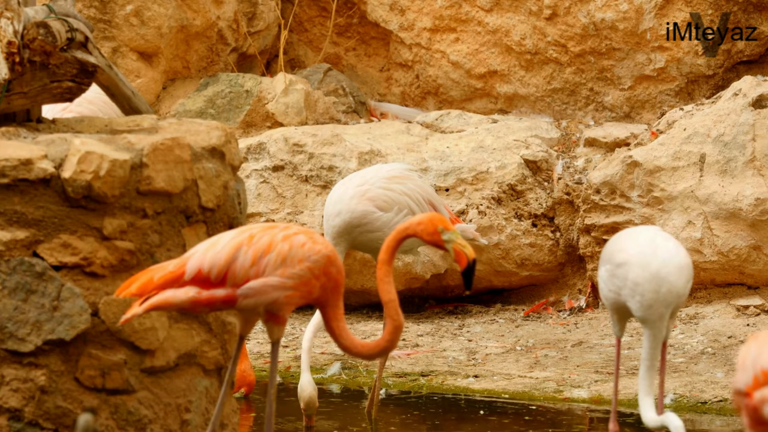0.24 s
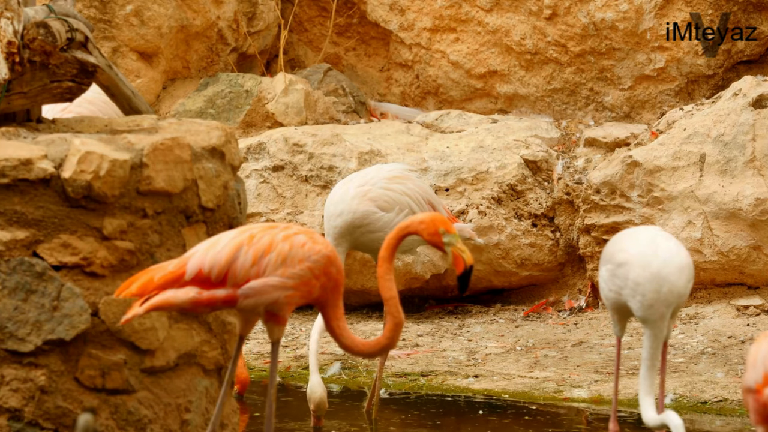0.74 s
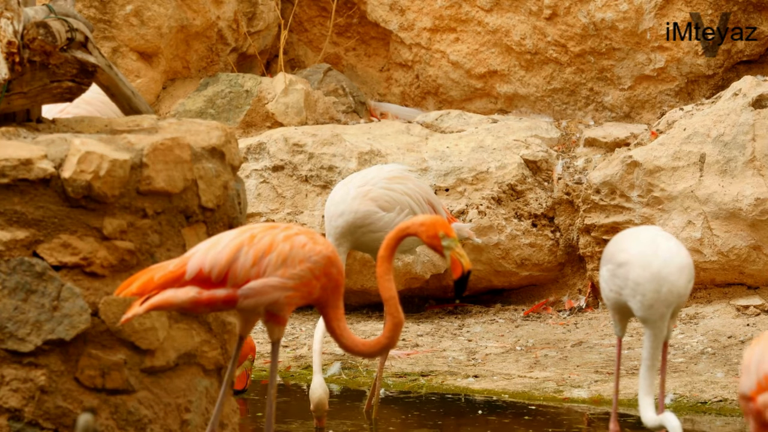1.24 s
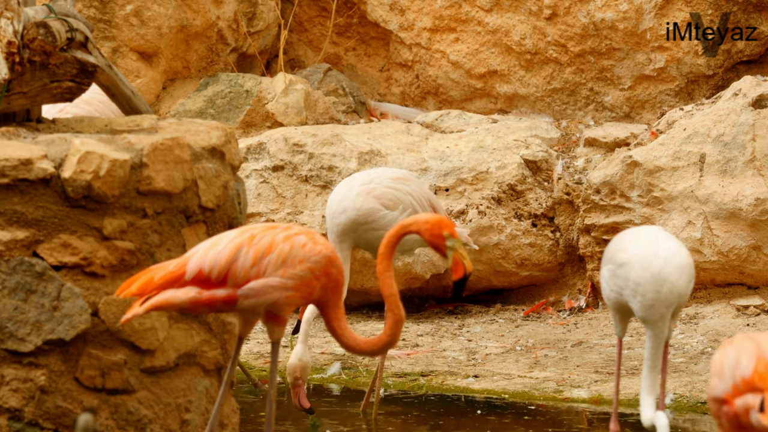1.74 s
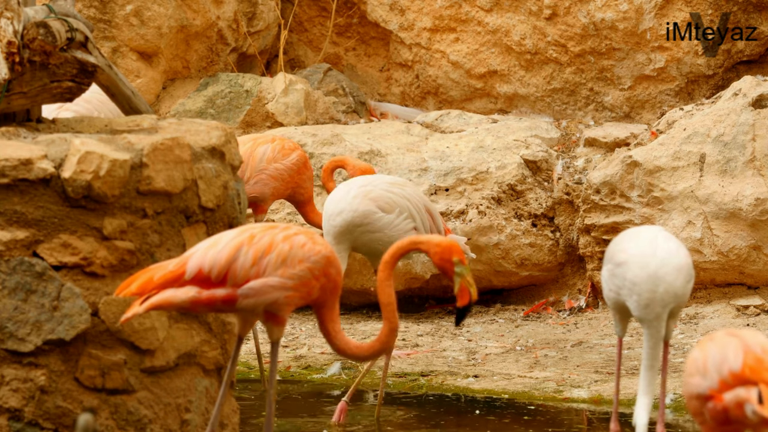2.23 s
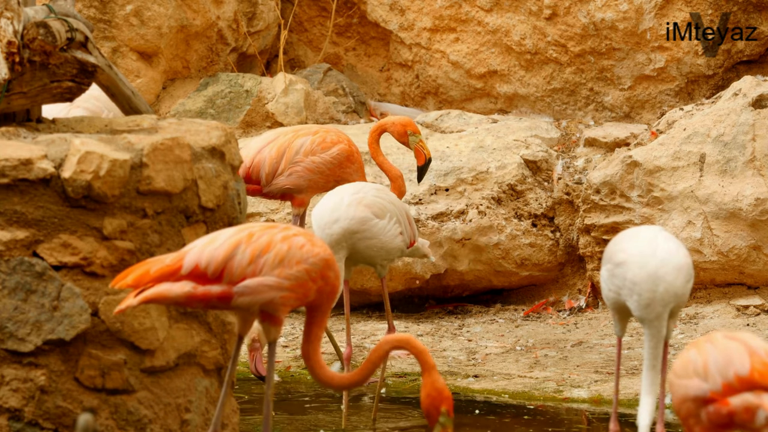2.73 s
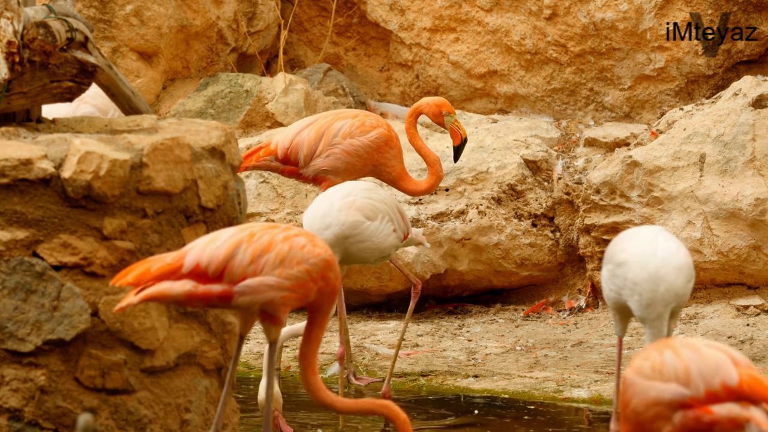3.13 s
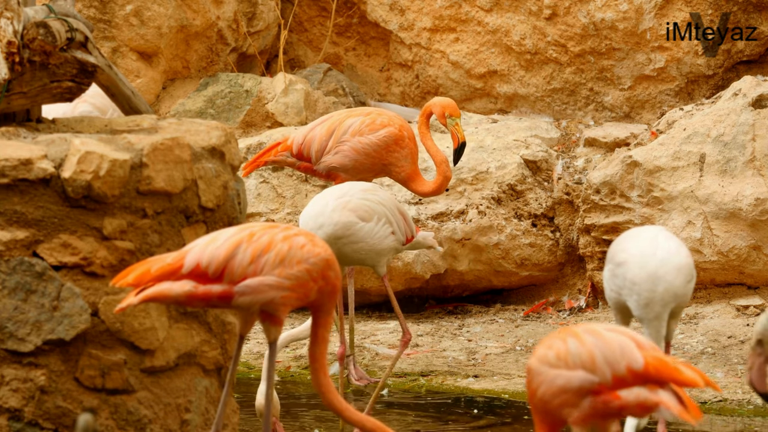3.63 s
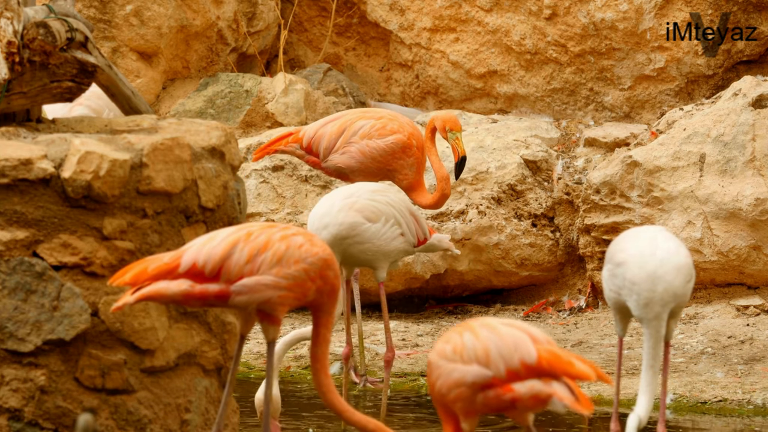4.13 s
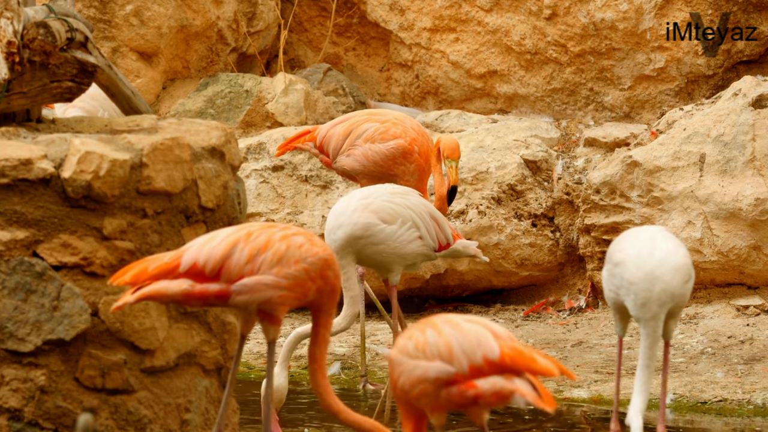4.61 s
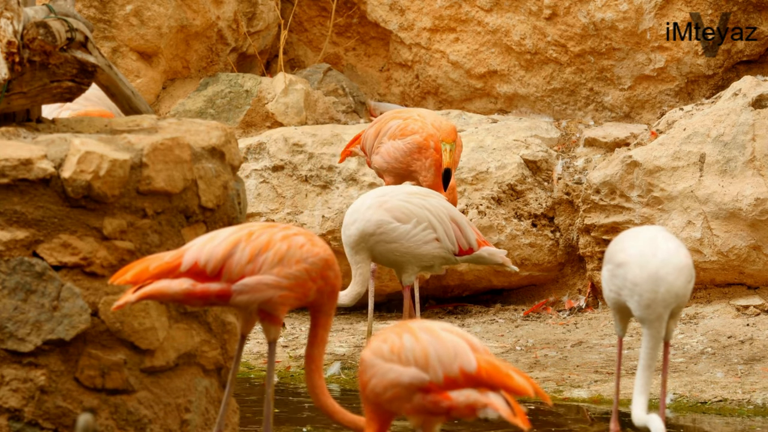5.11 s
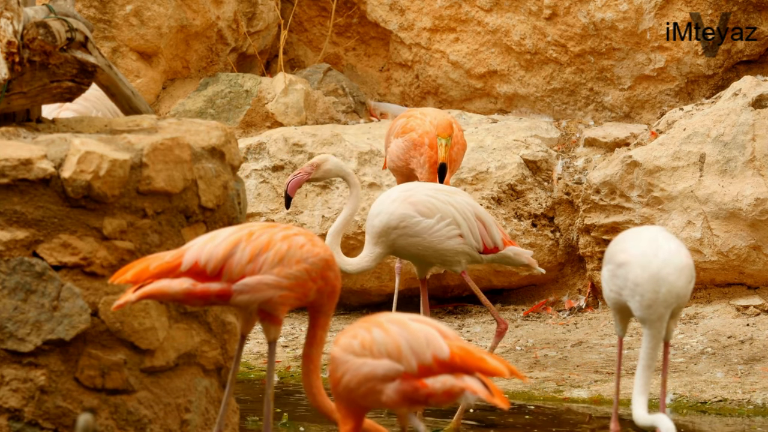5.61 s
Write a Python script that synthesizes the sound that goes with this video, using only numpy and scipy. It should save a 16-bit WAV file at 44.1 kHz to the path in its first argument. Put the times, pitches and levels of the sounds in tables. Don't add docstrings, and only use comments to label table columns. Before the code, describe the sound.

Stereo outdoor ambience beside shallow water: low murmur, hollow gurgling and a thin, high insect hiss. Distant flamingos gabble and honk, mostly to the right. One close bird gives a weak honk and a squeal, then from just before one second repeats dry, nasal, rasping barks almost four times a second until the end. A few tiny falling whistles appear in the later half. Rock walls add quick reflections and a light tail.

```python
import sys
import numpy as np
from scipy import signal
from scipy.io import wavfile
from scipy.ndimage import uniform_filter1d

SR = 44100
rng = np.random.default_rng(int(sys.argv[2]) if len(sys.argv) > 2 else 0)


def undo_db(level):
    steps = np.asarray(level, float) / 20
    return 10 ** steps


def unload_audio(sound):
    columns = np.transpose(np.atleast_2d(sound))
    steps = np.round(np.clip(columns, -1, 1) * 32767)
    wavfile.write(sys.argv[1], SR, steps.astype(np.int16))


N = 258426
SIDE = np.array([[1], [-1]])


def unit(x):
    return x / np.sqrt(np.mean(x ** 2))


def ring(x, hz, width):
    return signal.lfilter(*signal.iirpeak(hz, hz / width, SR), x)


def double_ring(x, hz, width):
    return ring(ring(x, hz, width), hz, width)


def walk(rate, count):
    k = int(SR / rate)
    held = np.repeat(rng.standard_normal(count // k + 1), k)
    return 1.29 * uniform_filter1d(uniform_filter1d(held, k), k)[:count]


def add(out, sound, start_s, pan_db):
    i = int(start_s * SR)
    placed = sound * undo_db(pan_db * SIDE / 2)
    out[:, i:i + len(sound)] += placed[:, :N - i]


def murmur(water_db, pan_db):
    # hz, level_db (per Hz)
    spectrum = [(15, -62), (25, -25), (70, -30), (130, -6.5), (242, -0.5), (326, -1.5), (560, -12),
                (800, -10.5), (1300, -14.5), (2200, -23), (3800, -18.5), (6400, -33.5), (14800, -45),
                (16000, -51)]
    hz_points, db_points = np.transpose(spectrum)
    total, swell = 0, walk(0.387, N)
    for hz in 28 * 2 ** np.arange(0, 9.2, .5):
        sos = signal.butter(1, [hz / 1.222, hz * 1.294], "band", fs=SR, output="sos")
        mid, other = signal.sosfilt(np.vstack([sos, sos]), rng.standard_normal((2, N)))
        low_share = 1 / (1 + (hz / 830.0) ** 2) / (1 + (120.0 / hz) ** 2)
        db = np.interp(np.log(hz), np.log(hz_points), db_points) + low_share * (water_db + 48.0)
        db = db + .8 * swell + 1.2 * walk(7, N)
        spread = np.clip(hz / 525.0, .33, 1.2) * other * SIDE
        total = total + undo_db(db + low_share * SIDE * pan_db / 2) * (mid + spread)
    return undo_db(-23.5) * total


def gurgle(water_db, pan_db):
    mid, other = rng.standard_normal((2, N))
    hollow = double_ring(mid + .5 * other * SIDE, 290., 130.)
    lumpy_db = 3 * walk(18, N) + 2 * walk(4, N)
    return undo_db(-49 + 2.2 * (water_db + 46) + lumpy_db + SIDE * pan_db / 2) * unit(hollow)


def cicadas(t):
    # hz, width_hz, level_db
    membranes = [(5200, 350, -6), (5396, 440, 5.5), (8000, 400, -18)]
    level_db = -47. + .5 * t - 4.5 * np.exp(-t / 0.31) + 0.52 * walk(1.23, N)
    mid, other = rng.standard_normal((2, N))
    source = mid + 0.18 * other * SIDE
    song = sum(undo_db(db) * double_ring(source, hz, width) for hz, width, db in membranes)
    shimmer = undo_db(1.2 * walk(14, N))
    return undo_db(level_db) * shimmer * unit(song)


def distant_flock(level_db):
    # hz, width_hz, level_db
    gabble = [(1170, 240, -5.5), (1371, 400, -7), (2300, 570, -9)]
    voices = rng.standard_normal((2, N)) * undo_db(2.5 * walk(60, N))
    flock = sum(undo_db(db) * double_ring(voices, hz, width) for hz, width, db in gabble)
    patchy = undo_db(2.2 * walk(15, N))
    return undo_db(level_db - 3.7 * SIDE) * patchy * unit(flock)


def ground():
    # start_s, water_db, flock_db
    swells = [(0.0, -55, -53.5), (0.15, -54.5, -43.5), (0.65, -50, -45.5), (1.37, -49.5, -43),
              (1.9, -49.5, -47.5), (2.5, -44.5, -42), (3.4, -47, -47.5), (3.801, -46.5, -51),
              (4.7, -42, -45), (5.3, -42, -48), (5.86, -44.5, -64)]
    s, *columns = np.transpose(swells)
    t = np.arange(N) / SR
    water_db, flock_db = (np.interp(t, s, c) for c in columns)
    pan_db = 2 - 0.73 * t
    return gurgle(water_db, pan_db) + murmur(water_db, pan_db) + cicadas(t) + distant_flock(flock_db)


def small_birds():
    # start_s, peak_db, pitch_hz, length_s
    chirps = [
        (3.564, -48, 3780, 0.053),
        (3.63, -60, 3800, 0.06),
        (3.714, -59, 4220, 0.048),
        (4.532, -37.5, 3870, 0.051),
        (5.658, -37, 3940, 0.039),
    ]
    out = np.zeros((2, N))
    for s, db, hz, length in chirps:
        t = np.arange(0, length, 1 / SR)
        wobble = 1 - 0.11 * t + 0.0068 * walk(150, len(t))
        whistle = np.sin(2 * np.pi * np.cumsum(hz * wobble) / SR)
        level = undo_db(db - 5.0 + 2.7 * walk(80, len(t)))
        add(out, level * np.sin(np.pi * t / length) * whistle, s, -2.)
    return out


def rocks(x):
    # late_s, left_db, right_db
    reflections = [
        (.0031, -43.5, -111),
        (.0074, -15.5, -10.5),
        (0.0115, -16.5, -9.5),
        (0.0196, -23, -44),
    ]
    # hz, t60_s, level_db
    tails = [(680, 0.55, -12), (1400, 0.3, -29), (2070, 0.9, -16), (4060, 1.0, -17.5), (6160, 0.96, -15),
             (10000, 0.11, -8.5)]
    t = np.arange(SR) / SR
    response = np.zeros((2, SR))
    for hz, t60, db in tails:
        sos = signal.butter(2, [hz / np.sqrt(2), hz * np.sqrt(2)], "band", fs=SR, output="sos")
        band = signal.sosfilt(sos, rng.standard_normal((2, SR)))
        decay = undo_db(-60 * t / t60) + undo_db(3.0 - 60 * t / 0.27)
        response += band * undo_db(db - 32.5) * decay * np.minimum(t / 0.0072, 1)
    slap_s, slap_db = 0.104, np.array([[-20], [-32]])
    rough_wall = rng.standard_normal((2, SR)) * np.exp(-np.abs(t - slap_s) / 0.0035)
    response += rough_wall * undo_db(slap_db - 25.5)
    echoes = np.zeros((2, SR))
    for late, left_db, right_db in reflections:
        echoes[:, int(late * SR)] = undo_db(np.array([left_db, right_db]))
    close = signal.fftconvolve(x, echoes, axes=1)[:, :N]
    tail = signal.fftconvolve(x.mean(0)[None], response, axes=1)[:, :N]
    return close, tail


def windpipe(drive, modes):
    pipe = 0
    for k, (hz, width, db) in enumerate(modes):
        mode = ring(ring(drive, hz, width), hz, 3.17 * width)
        pipe = pipe + (-1) ** k * undo_db(db) * np.sqrt(300 / width) * mode
    pipe = signal.sosfilt(signal.butter(3, 7360, fs=SR, output="sos"), pipe)
    return signal.sosfilt(signal.butter(2, 900., "high", fs=SR, output="sos"), pipe)


def voice(first_hz, last_hz, length, nasal_db, modes, hiss_db, rough):
    t = np.arange(4000) / SR
    hz = last_hz + (first_hz - last_hz) * np.exp(-(t / .016) ** 1.574)
    push = .58 + .42 * np.sin(np.pi / 2 * np.minimum(t / (.4 * length), 1))
    push = push * undo_db(-13. * np.maximum(t / length - .45, 0) / 1.36)
    push = push / (1 + np.exp(np.minimum((t - length) / 0.0057, 50)))

    even = 2 * np.pi * np.cumsum(hz * (1 + rough * .03 * walk(250, len(t)))) / SR
    swell = undo_db(rough * 4. * walk(300, len(t)))
    chest = undo_db(-10.5) / np.sqrt(1 + ((hz - 530.) / 60.0) ** 2)
    partials = np.cos(2 * even) + chest * np.cos(even)
    nasal = undo_db(nasal_db + 3.5) * np.exp(-t / 0.026) * push * swell * partials / 20

    rough = rough * (.4 + np.minimum(t / .012, 1))
    phase = 2 * np.pi * np.cumsum(hz * (1 + rough * .085 * walk(600, len(t)))) / SR - np.pi / 4
    clicks = np.exp(60. * (np.cos(phase) - 1))
    air = rng.standard_normal(len(t)) * (.5 + np.cos(phase / 2) ** 2) * push
    drive = clicks * undo_db(rough * 3.2 * walk(600, len(t))) * push + rough * .1 * air

    body = undo_db(-15) * rough * double_ring(air, 530., 123)
    sound = nasal + windpipe(drive, modes) + body
    hiss = ring(ring(air, 5000.0, 7400.0), 6100.0, 7200.0)
    loud = slice(0, int(length * SR))
    return sound / np.std(sound[loud]) + undo_db(hiss_db) * hiss / np.std(hiss[loud])


def far_birds():
    # start_s, peak_db,
    # strongest_line_hz, pan_db (left minus right), pipe_db
    far_honks = [(0.1445, -26.5, 1353, -4, 0), (0.196, -46, 1150, -3.0, 7), (0.349, -24.5, 1150, -7, 3.5),
                 (0.59, -29.5, 1437, -12, 3.5), (0.6343, -30.5, 1335, -11, -1), (0.671, -28.5, 1294, -7, -10),
                 (0.7138, -29.5, 1170, -3, -14), (2.483, -25, 885, -14, -15), (0.809, -28.5, 1170, -13, 3.5),
                 (1.047, -36, 1177, -12, 6), (1.3663, -37, 1134, 0.0, -23), (2.095, -32, 1191, -21, -6),
                 (2.18, -35, 1205, -18, -5), (2.7514, -25, 1089, -25, -1.5), (2.7528, -23, 1495, -12.5, -17),
                 (2.808, -24.5, 1400, -9, 6.5), (3.0284, -28.5, 1104, -30, -8), (3.102, -25, 1228, -11, 6.5),
                 (3.5316, -41.5, 1296, -29, -21), (3.5713, -30.5, 1274, -10, -23), (3.919, -33, 1092, -21, 5),
                 (4.27, -39, 1018, -19, 10)]
    out = np.zeros((2, N))
    for s, db, hz, pan_db, pipe_db in far_honks:
        modes = [(997.0, 270, 4.8), (1466.0, 83, 0.54), (2290.0, 470, pipe_db),  # Hz, width Hz, dB
                 (3060.0, 490, pipe_db - 1.5), (4300.0, 2200, pipe_db + 1.5)]
        honk = voice(hz / 2 * 1.04, hz / 2 * .95, .033, 2.4, modes, -57.0, rough=.85)
        add(out, undo_db(db - 12.5) * honk, s, pan_db)
    return out


def squeal():
    # start_s, pitch_hz, effort_db
    contour = [
        (0.409, 1400, -47),
        (0.448, 1430, -23.5),
        (0.463, 1475, -18.5),
        (0.473, 1441, -15),
        (0.481, 1400, -10.5),
        (0.490, 1330, -17),
        (0.496, 1290, -45),
    ]
    # hz, width_hz, level_db
    throat = [(566, 140, 1), (1150, 420, 7.5), (2000, 1360, 0.5), (4730, 1040, 1.5), (7270, 2500, -7.5),
              (11700, 13000, -19.5)]
    s, *columns = np.transpose(contour)
    t = np.arange(s[0], s[-1], 1 / SR)
    hz, effort_db = (np.interp(t, s, c) for c in columns)
    lock_s, lock_takes_s = 0.462, 0.0087
    locked = 1 / (1 + np.exp((lock_s - t) / (lock_takes_s / 2)))
    tone_db = effort_db - 15. * (1 - locked)
    rasp_db = effort_db - 11. * locked
    fourth_db = effort_db - 2.5 - 14.4 * np.abs(t - 0.468) / 0.013
    phase = 2 * np.pi * np.cumsum(hz) / SR
    air = rng.standard_normal(len(t)) * undo_db(2.2 * walk(400, len(t)))
    rasp = sum(undo_db(db) * double_ring(air, centre, width) for centre, width, db in throat)
    tone = undo_db(tone_db + 3.5) * np.sin(phase) + undo_db(fourth_db + 2.5) * np.sin(4 * phase)
    out = np.zeros((2, N))
    add(out, tone + undo_db(rasp_db) * unit(rasp), s[0], 10.2)
    return out


def near_bird():
    # start_s, peak_db, first_pitch_hz, last_pitch_hz, hiss_db (rises as the beak turns to us)
    honks = [(0.0472, -16.5, 729, 626, -46), (0.85, -4, 656.6, 640, -55), (1.163, -1.5, 751, 591.5, -33),
             (1.4386, -2.5, 702, 635.4, -37), (1.7056, -1.5, 707.5, 569, -25),
             (1.9617, -2.5, 724.4, 530, -22), (2.2331, -5.5, 700.6, 598.4, -28),
             (2.5018, -5, 712, 628, -30), (2.778, -7.5, 703, 668, -32), (3.0564, -6, 690.4, 597.3, -29),
             (3.354, -7, 690, 604.6, -28), (3.8248, -5.5, 648, 653.5, -30), (4.079, -4.5, 714, 513, -27),
             (4.3513, -3.5, 698.6, 515, -17), (4.6266, -4, 704, 598, -18), (4.9166, -5.5, 645, 557, -17.5),
             (5.176, -4, 655.4, 541, -15.5), (5.4537, -4.5, 695.6, 530, -20.5),
             (5.7289, -5, 615.6, 524, -18)]
    # start_s, middle_pipe_hz (neck bend), nasal_db (over the pipe), low_ring_db, length_s
    neck = [(0.05, 2300, 0.5, 5.5, 0.031), (0.85, 2656, -2.5, 3, 0.03), (1.17, 2560, -5.5, 3.5, 0.035),
            (1.71, 2450, -6.5, 2, 0.029), (2.2, 2460, -4.5, -3, 0.039), (2.78, 2514, -1, 5, 0.033),
            (3.788, 2300, -6.5, -1, 0.028), (4.08, 2325, -4, -3, 0.038), (4.495, 2380, -6, 1.5, 0.033),
            (5.0, 2375, -3.5, -7.5, 0.027), (5.727, 2275, -2, -3, .031)]
    # start_s, hoarseness (0-1)
    hoarseness = [(0.05, .4), (0.85, .25), (1.16, .55), (1.45, .45), (2.0, .75), (3.5, .75), (3.82, .5),
                  (4.1, .8), (4.65, .75), (4.9, .5), (5.45, .7), (5.73, .6)]
    # hz, width_hz, level_db
    skull_modes = [(4397, 320, -15.5), (5190, 760, -13), (6060, 440, -21.5), (6630, 1220, -16.5),
                   (9800, 490, -38)]
    pipe_width_hz = [170, 210, 250, 290]
    pipe_level_db = [1.5, 2.5, 0]
    out = np.zeros((2, N))
    at, *posture = np.transpose(neck)
    skull = [(hz, width, level_db + 11.) for hz, width, level_db in skull_modes]
    for s, db, first, last, hiss_db in honks:
        middle, nasal_db, low_db, length = (np.interp(s, at, c) for c in posture)
        pipe_hz = [2.874 * first, middle, 3035, 3857]
        pipe = list(zip(pipe_hz, pipe_width_hz, [low_db] + pipe_level_db))
        nose = [(first + last, 330., nasal_db + 2.5)]
        rough = np.interp(s, *np.transpose(hoarseness))
        honk = voice(first, last, length, nasal_db, nose + pipe + skull, hiss_db, rough)
        pan_db = 0.94 + 16 * np.exp(-s / 0.38)
        add(out, undo_db(db - 9.5) * honk, s, pan_db)
    return out


def scene():
    near = near_bird() + squeal()
    far = far_birds() + small_birds()
    close, tail = rocks(near)
    far_close, far_tail = rocks(far)
    return near + close + tail + far + far_close + undo_db(16.0) * far_tail + ground()


def band_limit(x):
    return signal.sosfilt(signal.butter(12, 16640, fs=SR, output="sos"), x)


def record(dry):
    x = np.tanh(dry)
    x = signal.sosfilt(signal.butter(2, [55., 13500.], "band", fs=SR, output="sos"), x)
    x = signal.sosfilt(signal.ellip(6, .2, 25, 15800, fs=SR, output="sos"), x)
    return band_limit(x)


dry = scene()
out = record(dry)
unload_audio(out)
```